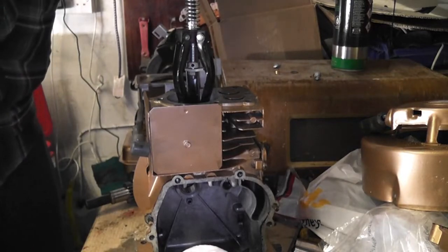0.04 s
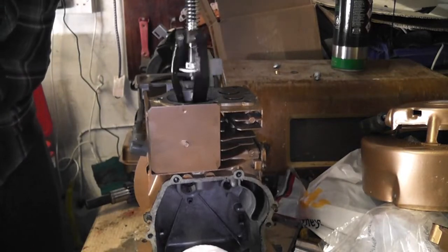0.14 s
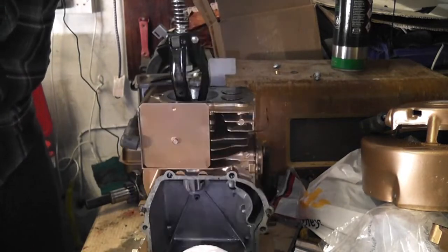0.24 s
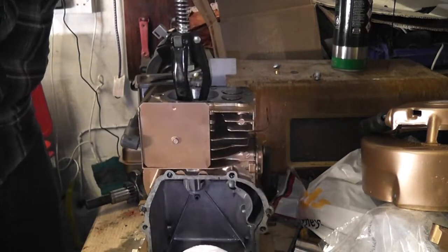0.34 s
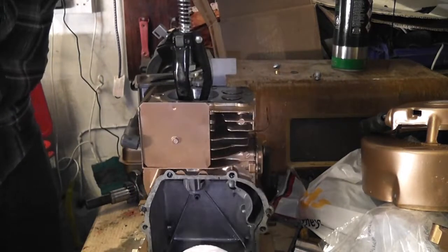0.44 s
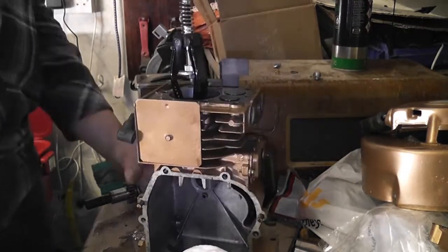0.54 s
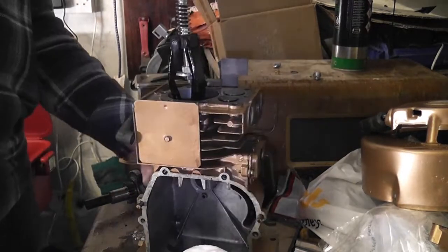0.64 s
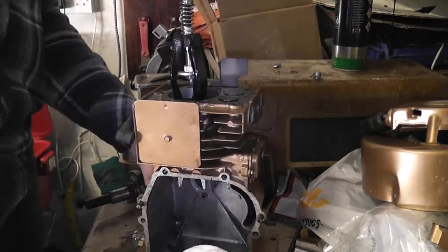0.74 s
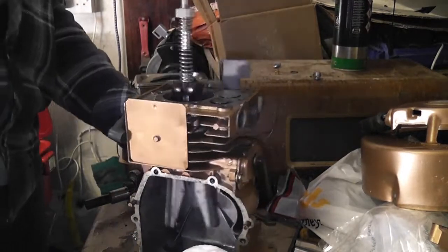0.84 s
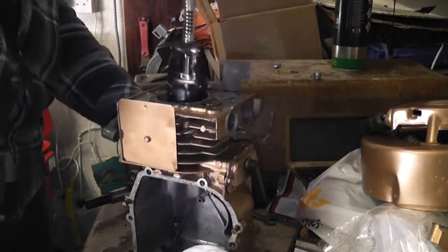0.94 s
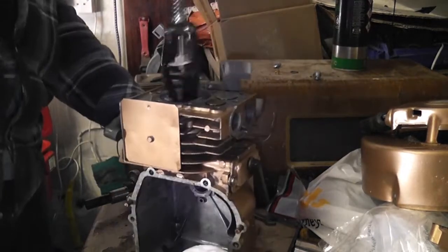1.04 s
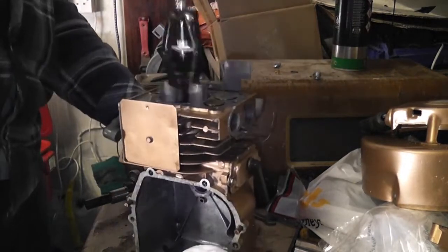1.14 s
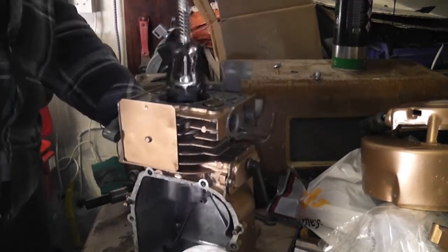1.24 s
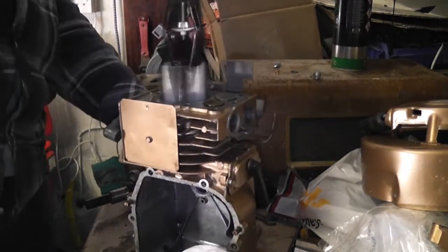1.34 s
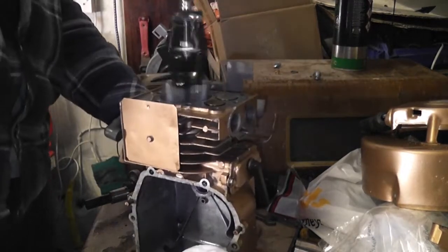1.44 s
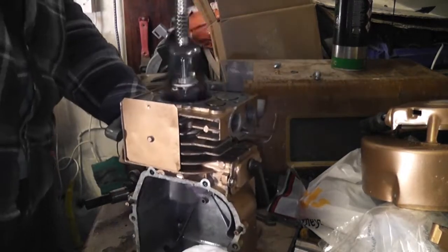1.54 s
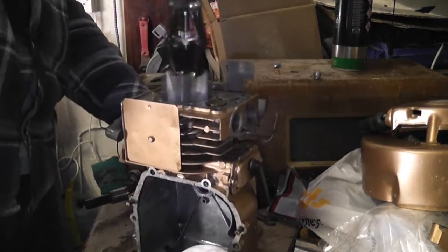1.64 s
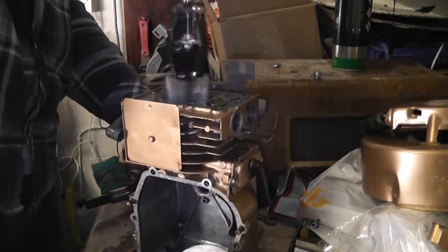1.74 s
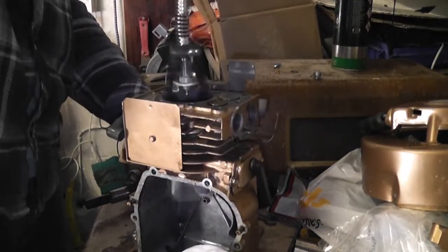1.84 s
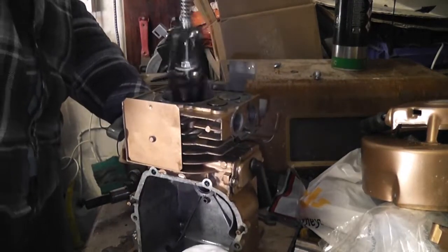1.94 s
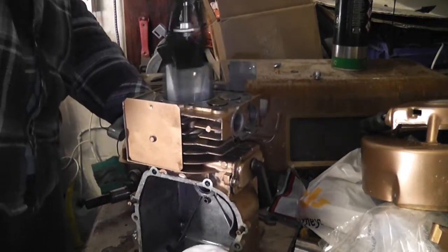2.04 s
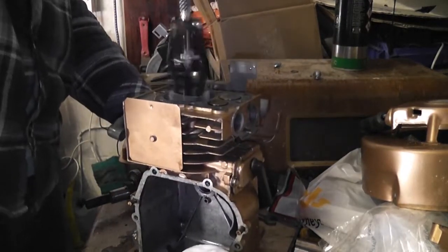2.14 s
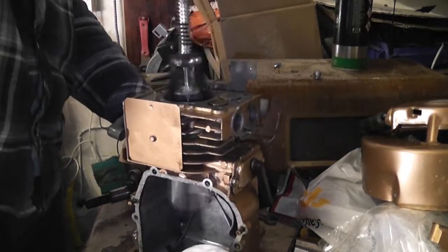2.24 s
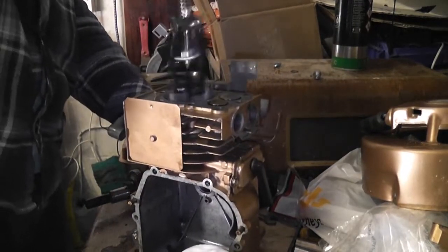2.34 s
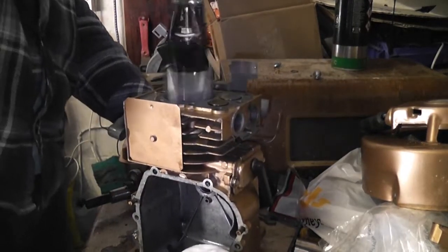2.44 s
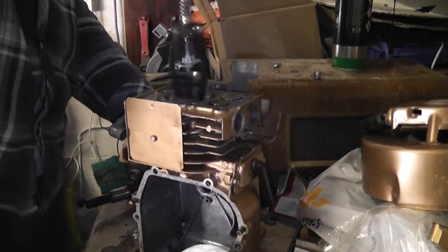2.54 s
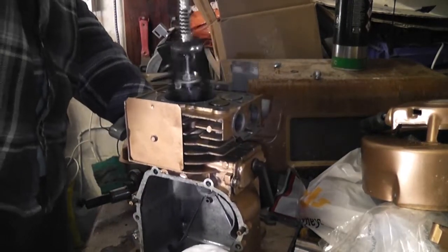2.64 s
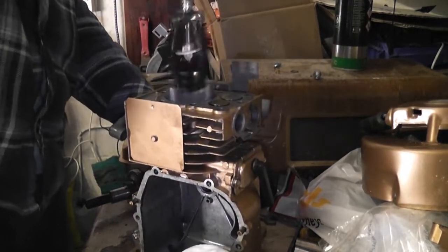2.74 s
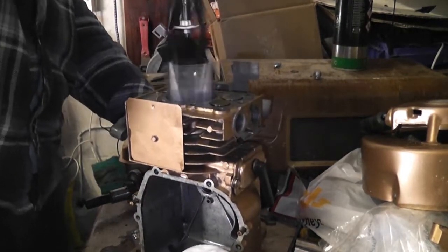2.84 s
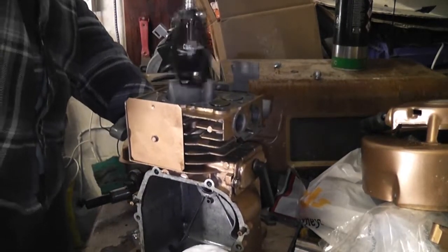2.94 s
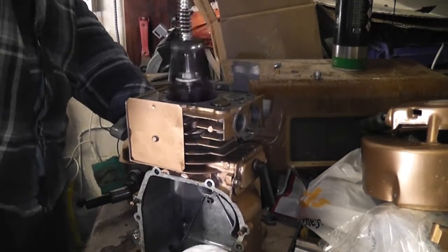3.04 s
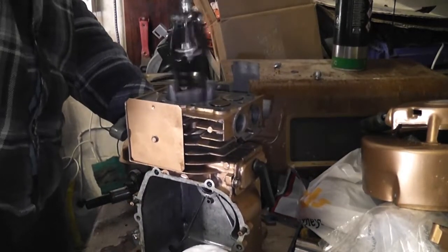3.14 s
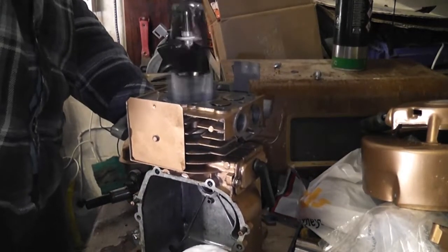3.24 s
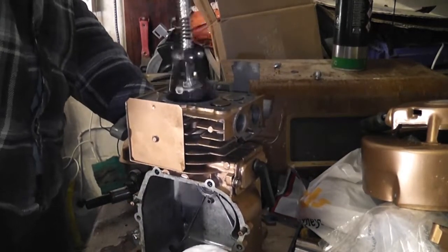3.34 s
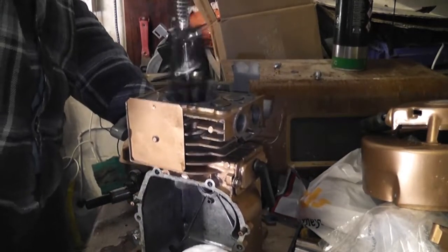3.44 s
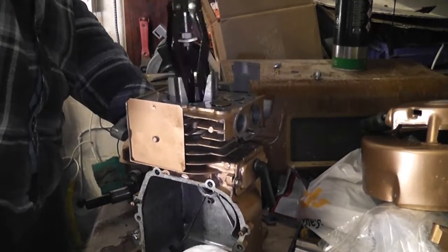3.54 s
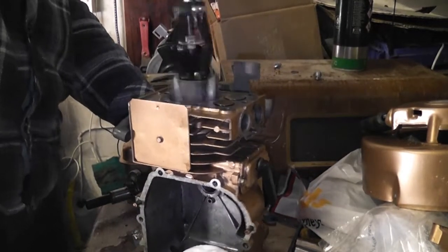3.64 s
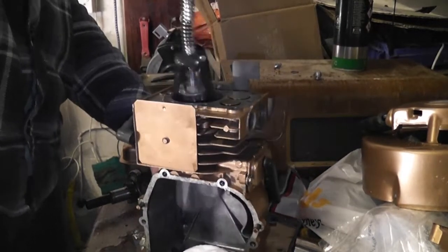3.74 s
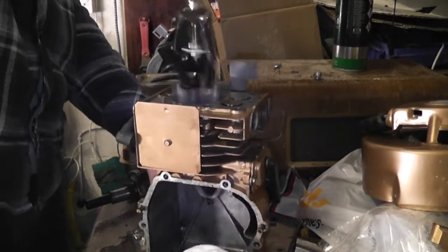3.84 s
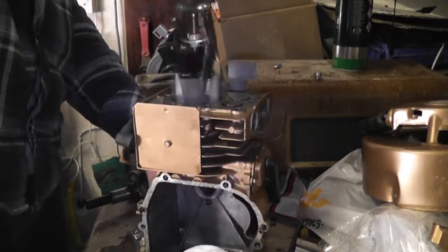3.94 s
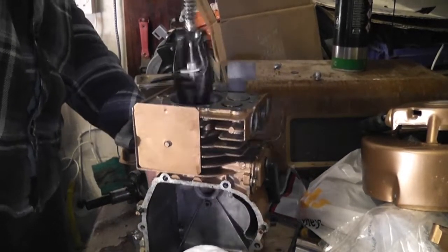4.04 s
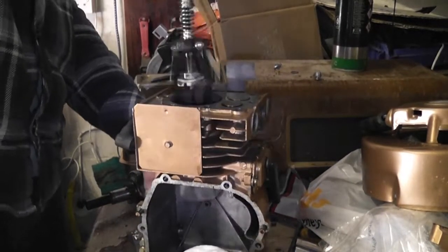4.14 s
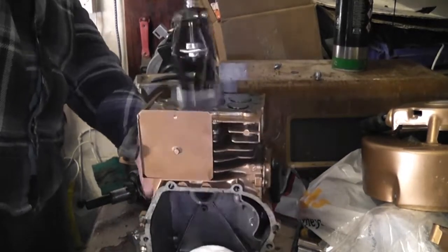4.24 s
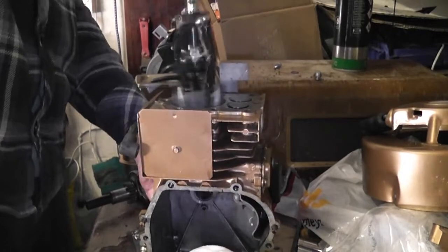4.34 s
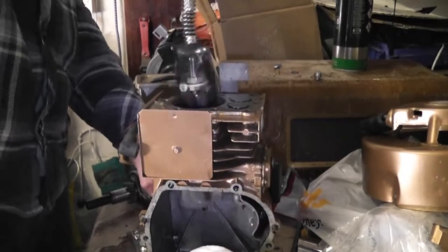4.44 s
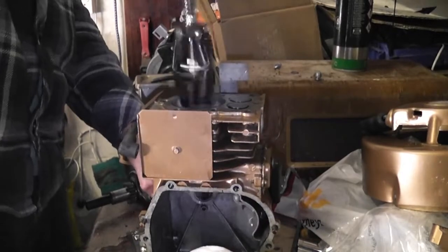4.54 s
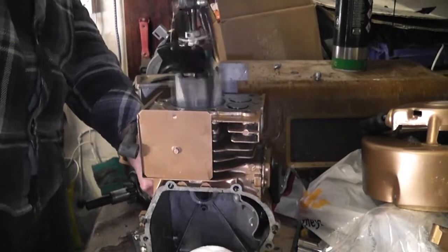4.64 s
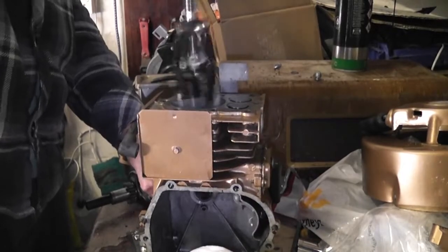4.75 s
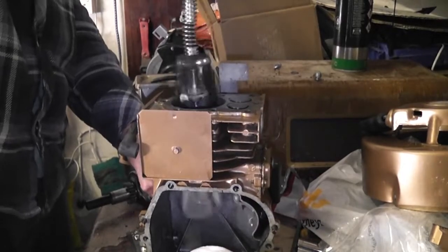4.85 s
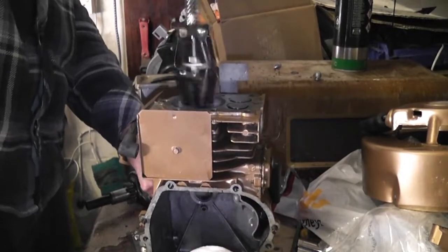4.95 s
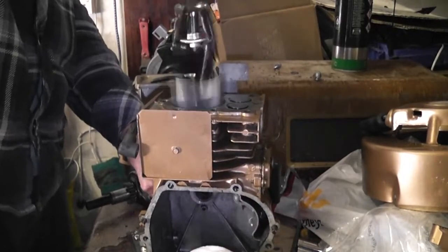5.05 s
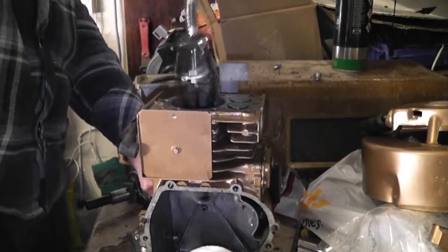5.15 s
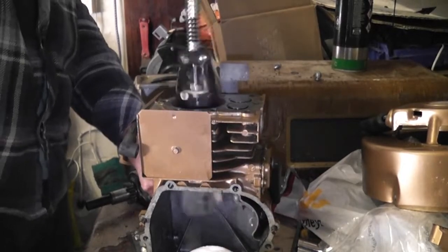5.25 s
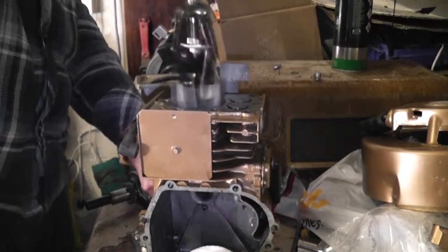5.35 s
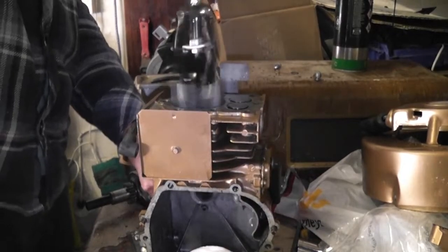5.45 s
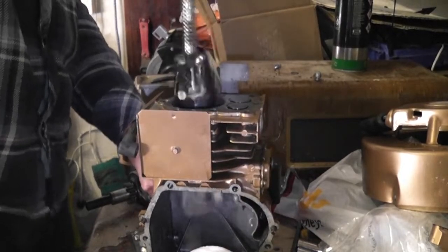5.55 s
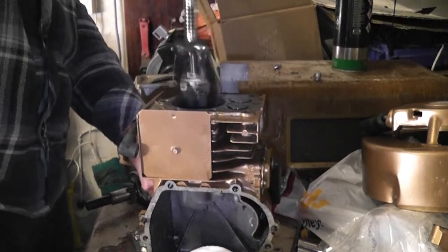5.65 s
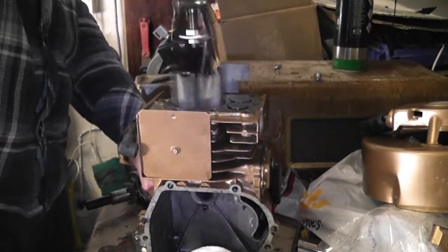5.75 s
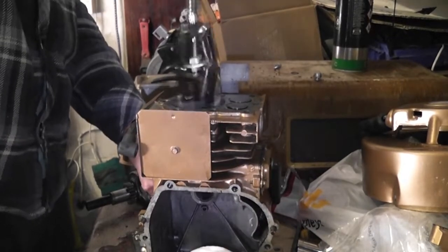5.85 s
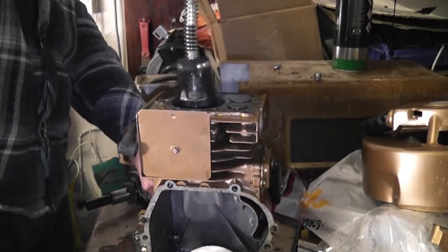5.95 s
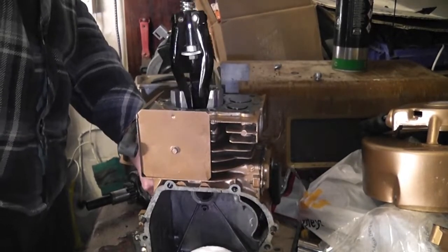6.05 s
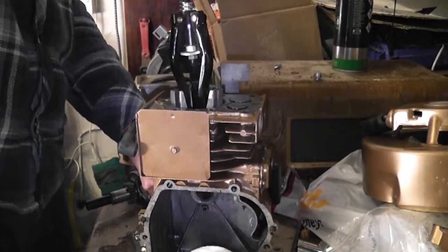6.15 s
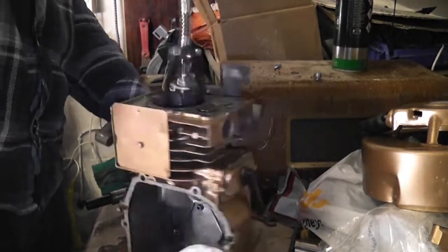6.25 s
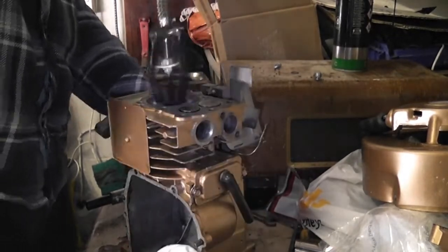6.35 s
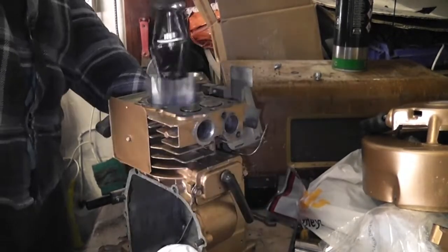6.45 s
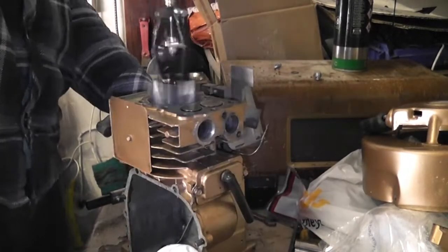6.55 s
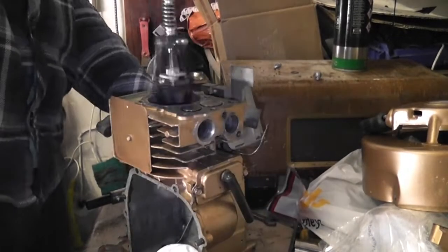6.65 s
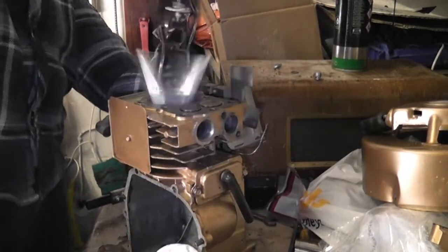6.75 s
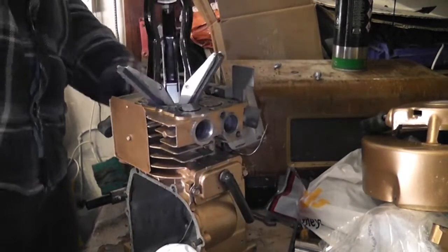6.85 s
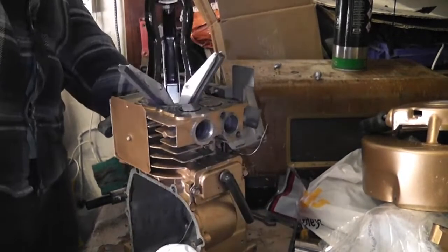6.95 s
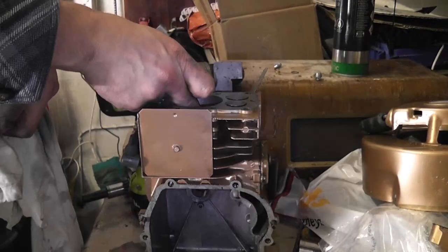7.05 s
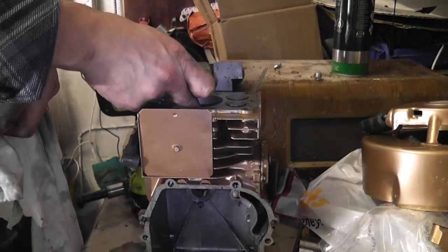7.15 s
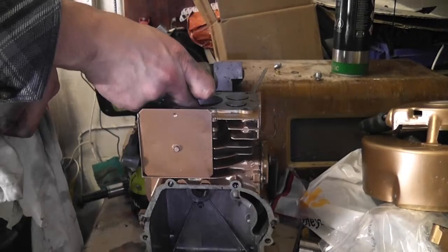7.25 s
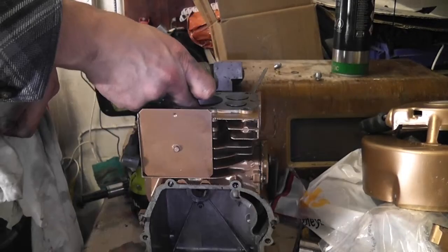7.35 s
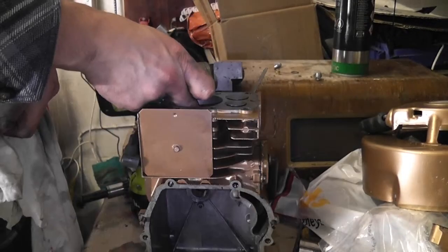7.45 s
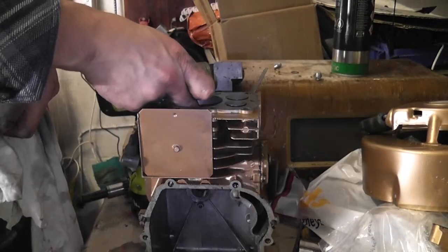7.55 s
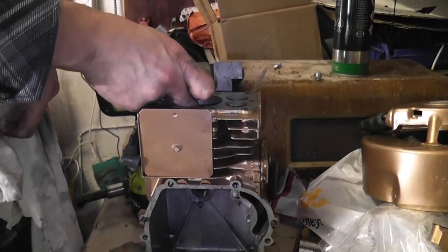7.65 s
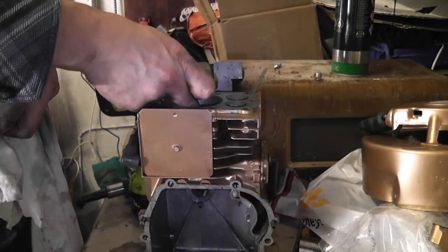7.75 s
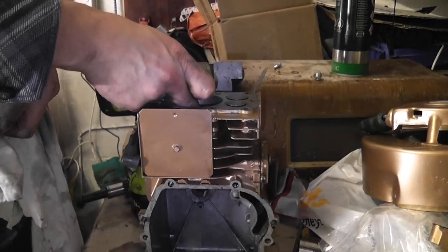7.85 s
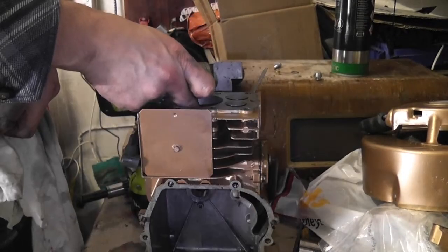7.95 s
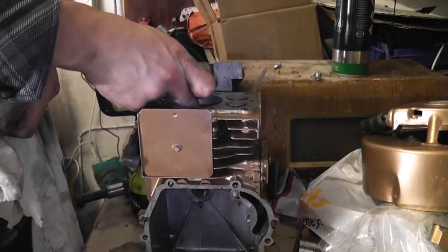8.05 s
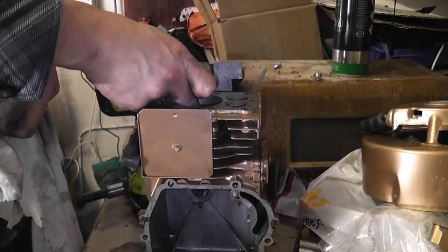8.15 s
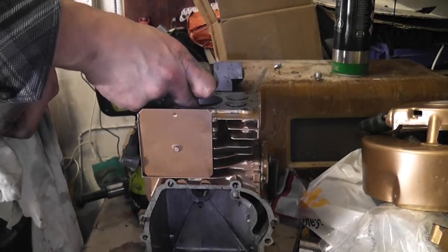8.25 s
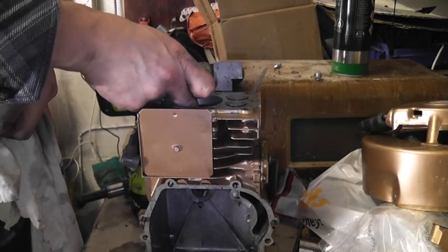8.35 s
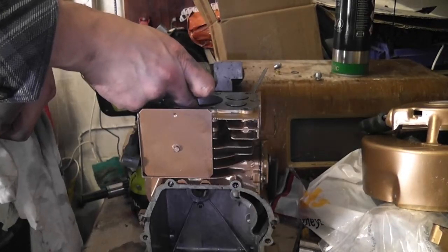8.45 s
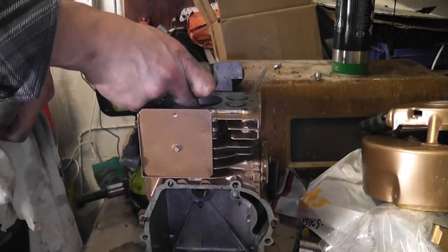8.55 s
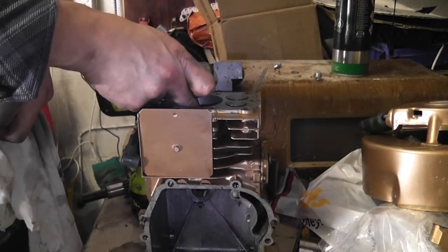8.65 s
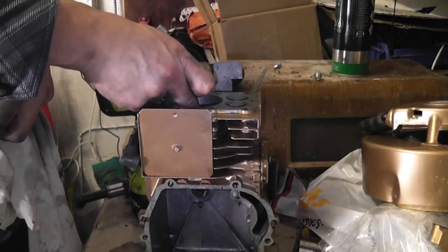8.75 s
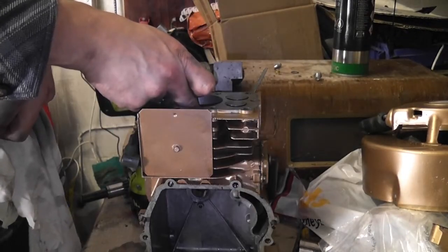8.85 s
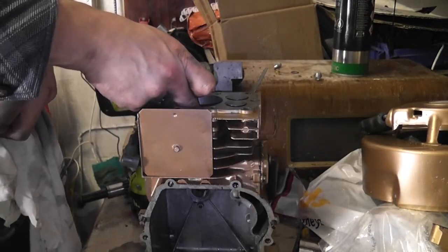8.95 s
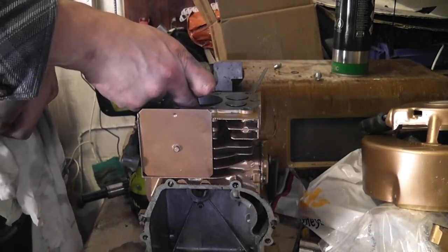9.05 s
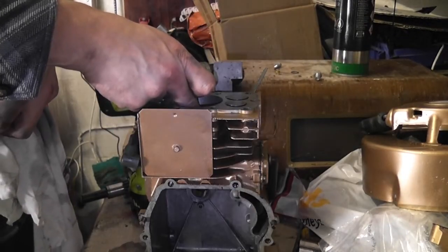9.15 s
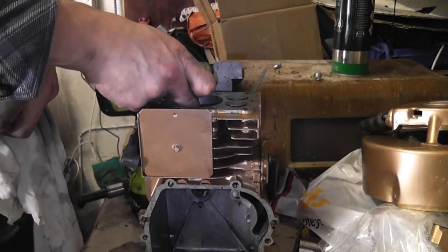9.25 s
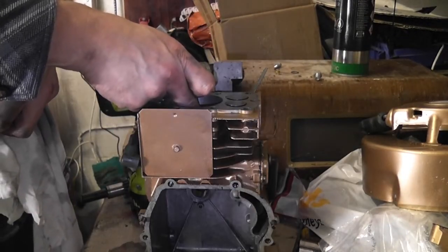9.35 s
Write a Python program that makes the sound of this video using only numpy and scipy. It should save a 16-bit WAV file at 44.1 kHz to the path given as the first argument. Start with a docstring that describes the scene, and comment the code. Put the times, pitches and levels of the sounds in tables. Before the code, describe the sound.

A close stereo microphone in a small, cluttered garage with soft low background noise. From 0 to 0.3 s a small cast engine block clacks sharply and drags across a wooden bench: gritty crunch, high falling screech, judder and low boom, then faint scuffs. At about 0.8 s a drill-driven hone starts abruptly in the bore, a loud, bright, steely hiss fluttering at motor speed, with short gliding squeaks roughly fifteen times a second, thin metallic singing and low bench rumble. It breaks off near 3.55 s with a clack, catches briefly, and resumes at 3.7 s with less steady hiss and more biting, chattering rasps and rough high squeals. It stops at 6.04 s, restarts from 6.2 to 6.77 s, then quits. A firmer thump comes near 7.2 s; until about 9.4 s, sparse, light woody-metal knocks and faint finger rubbing sit over the returning low room noise.

```python
"""A small engine block knocks and is dragged across a wooden bench with a screech, a judder and a boom.
A cordless drill then spins a three-stone hone in its bore: friction noise makes a bright hiss that flutters
at motor speed, gliding partials squeak as stones pass, and the metal sings; later the stones bite and chatter.
When the drill has stopped, a hand in the bore rocks the block, and decaying modes knock lightly on the bench."""
import sys
import numpy as np
from scipy import signal
from scipy.fft import rfft, irfft
from scipy.io import wavfile

SR = 44100
rng = np.random.default_rng(int(sys.argv[2]) if len(sys.argv) > 2 else 0)


def bounce(signal):
    """Save signal as a 16-bit WAV file at the path given by the first command-line argument."""
    frames = np.transpose(np.atleast_2d(signal))
    limited = np.clip(frames, -1, 1)
    pcm = np.round(limited * 32767).astype(np.int16)
    wavfile.write(sys.argv[1], SR, pcm)


N = 414788
T = np.arange(N) / SR

# Levels in the tables are relative: the functions trim their layers. Of a spectrum only the shape counts.


def amp(db):
    """Decibels to gain."""
    return np.exp(np.asarray(db) * (np.log(10) / 20))


def rms_one(x):
    """Scale to unit power."""
    return x / np.sqrt(np.mean(x ** 2) + 1e-20)


def level(rows, column=1):
    """A dB column as a gain over time, down at -120 dB outside its span."""
    rows = np.array(rows)
    return amp(np.interp(T, rows[:, 0], rows[:, column], left=-120, right=-120))


def along(rows, s):
    """The columns of a curve at the given moments, or other first-column values."""
    times, *columns = np.transpose(rows)
    return [np.interp(s, times, column) for column in columns]


def colour(x, spectrum, size=16384):
    """Causal (minimum-phase) filter with the given spectrum; unit power."""
    hz, db = np.transpose(spectrum)
    bins_hz = np.arange(size // 2 + 1) * SR / size
    gain = amp(np.interp(np.log(bins_hz + 1), np.log(hz), db))
    # folding the cepstrum onto positive time gives minimum phase
    cepstrum = irfft(np.log(gain))
    cepstrum[1:size // 2] *= 2
    cepstrum[size // 2 + 1:] = 0
    impulse = irfft(np.exp(rfft(cepstrum)))
    return rms_one(signal.oaconvolve(x, impulse[None], axes=1)[:, :N])


def drift(rate):
    """Smooth chance with so many random points a second; unit power."""
    points = rng.standard_normal(int(N / SR * rate) + 2)
    return rms_one(np.interp(T * rate, np.arange(len(points)), points))


def stereo_noise(alike):
    """White noise, partly shared by both ears."""
    alike = np.clip(alike, 0, 1)
    shared = rng.standard_normal(N)
    return np.sqrt(alike) * shared + np.sqrt(1 - alike) * rng.standard_normal((2, N))


def grains(alike, rough_db, rate):
    """Friction noise: grit breaks away in tiny bursts of uneven strength."""
    return stereo_noise(alike) * amp(rough_db * drift(rate))


def poles(hz, width):
    """Second-order polynomial of a resonance; its width in Hz sets the damping."""
    r = np.exp(-np.pi * width / SR)
    return np.array([1, -2 * r * np.cos(2 * np.pi * hz / SR), r * r])


def ring(x, hz, t60):
    """A unit click sets a decaying sine of starting height 1 ringing."""
    width = np.log(1000) / np.pi / t60
    return signal.lfilter([0, np.sin(2 * np.pi * hz / SR)], poles(hz, width), x + 1e-18)


def swell(s, length):
    """The samples around a moment, and a flat-topped swell over them."""
    near = slice(max(int((s - length) * SR), 0), int((s + length) * SR))
    return near, np.exp(-(2 * (T[near] - s) / length) ** 4)


def swells(rows):
    """Gain over time of (t/s, length/s, level/dB) swells."""
    gain = np.zeros(N)
    for s, length, db in rows:
        near, shape = swell(s, length)
        gain[near] += amp(db) * shape
    return gain


def tones(rows, wander, waver_hz, flicker_db):
    """Wavering sines on (t/s, length/s, f/Hz, level/dB) swells, out of step between the ears."""
    out, slow, fast = np.zeros((2, N)), drift(9), drift(110)
    flicker = amp(flicker_db * drift(24))
    ears = np.array([0.33 * drift(12.0), 1.4 + 0.19 * drift(6.45)])  # phase in radians
    for s, length, hz, db in rows:
        near, shape = swell(s, length)
        pitch = hz * (1 + wander * slow[near]) + waver_hz * fast[near]
        phase = 2 * np.pi * np.cumsum(pitch) / SR
        out[:, near] += amp(db) * shape * flicker[near] * np.sqrt(2) * np.sin(phase + ears[:, near])
    return out


def room(x, t60):
    """Diffuse reflections off the cluttered walls, different at each ear."""
    t = T[:SR // 2]
    tail = rng.standard_normal((2, len(t))) * amp(-60 * t / t60) * (t > .003)
    tail = tail / np.sqrt((tail ** 2).sum(1, keepdims=True))
    return signal.fftconvolve(np.atleast_2d(x), tail, axes=1)[:, :N]


# background of the garage: (t/s, level/dB)
GARAGE_LEVEL = [(0, -44.5), (.72, -48), (.76, -49.5), (6.85, -65.5), (6.95, -57), (7.01, -47.5),
                (9.41, -47)]
# spectrum of that background: (f/Hz, level/dB per Hz)
AIR_SPECTRUM = [(25, -35.5), (70, -6.5), (120, -1.5), (155, 2.5), (205, -9.5), (330, -10), (450, -8.5),
                (740, -12.5), (930, -10.5), (1450, -21), (2500, -26.5), (6000, -35.5), (9000, -40.5),
                (16000, -51.5)]


def garage_air():
    """Soft noise, strongest in the lows; it sinks gradually until almost 7 s, then returns quickly."""
    return level(GARAGE_LEVEL) * colour(grains(0.7, rough_db=0.26, rate=38), AIR_SPECTRUM)


# ringing modes of the cast block: (f/Hz, level/dB, t60/s)
CASTING_MODES = [(1230, -23, .03), (1560, 2.5, .008), (2364, -5.5, .035), (2850, -16, .022),
                 (3233, -5.5, 0.057), (3430, -3, 0.025), (4260, -6, 0.012), (5500, -9.5, 0.029),
                 (6200, -2, 0.027), (6900, -9.5, .035), (7500, -4, .018)]


def casting(x, vary_db):
    """The block's modes ring, each more or less strongly as the point of contact moves."""
    out = 0
    for hz, db, t60 in CASTING_MODES:
        even_power = np.sqrt(4 * np.log(1000) / (t60 * SR))  # white noise excites long and short modes alike
        out = out + amp(db + vary_db * drift(12)) * even_power * ring(x, hz, t60)
    return out


# the block knocks on the bench: (t/s, click level/dB, thump level/dB, scuff length/s)
BENCH_KNOCKS = [(0.031, -43.5, -62, 0.0084), (0.066, -29.5, -61, 0.002), (0.097, -30.5, -58, 0.018),
                (0.1439, -4.5, -37, 0.0019), (.153, -17, -29, .003), (.173, -10.5, -32, .005),
                (.267, -28, -21, .002), (.276, -22, -25, .002), (0.408, -24.5, -39, 0.015),
                (0.429, -30, -35.5, 0.015), (0.515, -37, -46, 0.012), (0.538, -41, -55, 0.0045),
                (.565, -42, -60, .005), (0.589, -32.5, -59, 0.023), (0.641, -32, -33.5, 0.029),
                (0.703, -27, -44, 0.005), (0.748, -36, -52, 0.0033), (6.811, -36.5, -46, 0.0095),
                (6.877, -47, -49, 0.0059), (7.124, -34.5, -32.5, 0.0044), (7.1753, -26, -22, 0.0063),
                (7.583, -34, -32.5, 0.004), (7.608, -46, -35, .012), (7.636, -50, -34, 0.016),
                (7.662, -45, -44, .005), (7.938, -35, -29, 0.012), (7.972, -35, -30.5, 0.0049),
                (7.989, -37, -35, 0.006), (8.049, -40, -34, 0.012), (8.218, -46, -36.5, 0.018),
                (8.398, -34.5, -26, 0.0072), (8.444, -33, -37, 0.0065), (8.517, -43, -41, 0.0089),
                (8.581, -38.5, -31.5, 0.0078), (8.739, -41, -29.5, 0.007), (8.783, -34.5, -28, 0.0074),
                (8.952, -39, -39.5, 0.0066), (9.131, -43, -31.5, 0.0066), (9.142, -32.5, -28.5, 0.0071),
                (9.287, -31.5, -32.5, 0.0051)]
# modes of the block on its bench: (f/Hz, level/dB, t60/s)
BENCH_MODES = [(132.5, -4, 0.14), (164.3, -1, 0.17), (228, -5, 0.082), (431, -5.5, 0.098),
               (465, -0.5, 0.027), (578, 5, 0.038), (642, -1, 0.02), (910, -23, 0.05), (1260, -35, .03)]
# spectrum of the scuffing grit: (f/Hz, level/dB per Hz)
GRIT_SPECTRUM = [(600, -31.5), (1500, 10.5), (2300, 0), (3350, 6), (4800, 0), (6200, 2.5), (7400, 4),
                 (8600, -1), (12000, -10.5), (16000, -16)]
SCUFF_RISE, THUMP_LAG_S = 0.23, .002   # share of the scuff's length; the bench answers a little later
# after each knock the block settles with a softer one: typical delay, levels relative to the knock
SETTLE_S, SETTLE_CLICK_DB, SETTLE_THUMP_DB = .032, -15, -10


def knocks():
    """Each knock is a gritty scuff ringing in the casting, and a thump with a small rebound in the bench."""
    scuff, thump = np.zeros(N), np.zeros(N)
    settling = [(s + SETTLE_S * rng.uniform(.7, 1.3), click_db + SETTLE_CLICK_DB,
                 thump_db + SETTLE_THUMP_DB, length) for s, click_db, thump_db, length in BENCH_KNOCKS]
    rows = np.vstack([BENCH_KNOCKS, settling])
    for s, click_db, thump_db, length in rows:
        start = int(s * SR)
        age = T[:min(SR // 4, N - start)]
        rise = 1 - np.exp(-age / (SCUFF_RISE * length))
        scuff[start:start + len(age)] += amp(click_db) * np.exp(-age / length) * rise
    s, _, thump_db, _ = np.transpose(rows)
    s = s + THUMP_LAG_S
    rebound = s + rng.uniform(0.00367, 0.0167, len(s))
    for k, (hz, db, t60) in enumerate(BENCH_MODES):
        blows = np.zeros(N)
        blows[(s * SR).astype(int)] = amp(thump_db + db + rng.normal(0, 0.7, len(s)))
        blows[(rebound * SR).astype(int)] = amp(thump_db + db - 2.5 + rng.normal(0, 1.6, len(s)))
        thump += (-1) ** k * ring(blows, hz, t60)  # neighbouring modes start in opposite directions
    grit = grains(0.89, rough_db=0.5, rate=1600)
    ringing = casting(scuff * grit, vary_db=3.0)
    return amp(-2.54) * scuff * colour(grit, GRIT_SPECTRUM) + amp(-11.5) * ringing + amp(-4.0) * thump


# the screech of the dragged block: (t/s, f/Hz, level/dB)
SCREECH_GLIDES = [(.075, 7220, -54), (.11, 6600, -47.5), (.128, 4200, -37), (.14, 3160, -32.5),
                  (.155, 3000, -70), (.178, 7500, -22), (.205, 7200, -23), (.217, 6650, -20),
                  (.235, 6500, -33.5)]


def screeching(waver=.035):
    """An edge of the sliding block screeches in falling glides: a sine with a rough pitch and level."""
    hz, _ = along(SCREECH_GLIDES, T)
    phase = 2 * np.pi * np.cumsum(hz * (1 + waver * drift(900))) / SR
    return level(SCREECH_GLIDES, column=2) * amp(2.5 * drift(370)) * np.sin(phase)


# the block is dragged: (t/s, grit level/dB, judder level/dB, bench boom level/dB)
DRAG_LEVELS = [(.115, -42, -44, -61), (.155, -22, -38, -34), (.18, -16, -38, -18.5), (.22, -22.5, -30, -20),
               (.25, -20, -23.5, -19.5), (.275, -32.5, -19.5, -18), (.297, -34, -26, -26),
               (.35, -53, -43.5, -33), (.42, -59, -56, -59)]
# spectrum of grit crushed under the block: (f/Hz, level/dB per Hz)
CRUNCH_SPECTRUM = [(600, -21.5), (1500, -8), (2300, -0.5), (3000, -3), (4800, 0), (5700, 0.5), (6800, -1.5),
                   (7700, -2), (8700, -12), (12000, -14.5), (16000, -39)]
# spectrum of the juddering block: (f/Hz, level/dB per Hz)
JUDDER_SPECTRUM = [(200, -19), (380, -2), (500, 1), (575, 4.5), (700, -0.5), (830, -11), (950, -5),
                   (1080, -16.5), (1230, -3), (1450, -10.5), (1740, -8), (2100, -15.5), (2500, -20.5),
                   (2690, -11), (2900, -19), (4100, -25.5), (6000, -44)]
# spectrum of the booming bench: (f/Hz, level/dB per Hz)
BOOM_SPECTRUM = [(25, -29), (90, -48), (128, 1.5), (160, 4), (225, -1.5), (320, -11), (600, -53)]


def dragging():
    """Grit crackles under the block; as it slows it judders and the bench booms."""
    grit = level(DRAG_LEVELS) * colour(grains(1.0, rough_db=2.5, rate=900), CRUNCH_SPECTRUM)
    judder = level(DRAG_LEVELS, column=2) * colour(grains(0.88, rough_db=1.5, rate=270), JUDDER_SPECTRUM)
    boom = level(DRAG_LEVELS, column=3) * colour(grains(0.93, rough_db=2.5, rate=100), BOOM_SPECTRUM)
    return amp(-1.2) * grit + screeching() + amp(0.5) * judder + amp(-5.5) * boom


# fingers rub the metal: (t/s at the middle, length/s, level/dB)
FINGER_RUBS = [(.33, 0.32, -52), (3.6, 0.14, -54), (6.163, 0.04, -63), (7.06, 0.29, -60),
               (7.36, 0.091, -63), (7.727, 0.031, -62), (7.81, 0.087, -59), (8.26, 0.18, -64),
               (8.53, 0.23, -69), (9.32, 0.2, -55.5)]
# spectrum of skin and sleeve on metal: (f/Hz, level/dB per Hz)
RUB_SPECTRUM = [(600, -25.5), (1500, 7.5), (2300, -1), (3350, 3), (4800, 0.5), (5900, 5), (7400, 0.5),
                (8600, -6), (12000, -17), (16000, -24)]
RESTING_HAND_DB = -72.5


def rubbing():
    """Fingers slide over the casting; once the drill has stopped the hand rests in the bore."""
    touch = swells(FINGER_RUBS) + amp(RESTING_HAND_DB) * (T > DRILL_RUNS[-1][1])
    return touch * colour(grains(1.0, rough_db=1.5, rate=33), RUB_SPECTRUM)


# while the drill rests the stones tick against the bore: (t/s, tick level/dB, clack f/Hz, clack level/dB)
STONE_TICKS = [(0.325, -42, 1740, -27), (3.582, -24, 1120, -25), (3.6, -32, 620, -32),
               (6.089, -38, 1050, -41), (6.921, -45, 1600, -43), (6.969, -45, 1500, -52)]
# modes of a stone on its arm: (f/Hz, level/dB, t60/s)
STONE_MODES = [(1560, -10, 0.0084), (1890, -13, .011), (2780, 2, .015), (3470, 2, .016), (5400, -5, .013),
               (7000, -9, .01), (8000, -13, .012)]


def ticks(count=2, spread=0.0024, crack_db=-6, crack_s=0.0083, body_t60=0.033):
    """A stone taps the wall with a gritty crack and short chatter; the bore clacks at a pitch set by the spot."""
    s, db, body_hz, body_db = np.transpose(STONE_TICKS)
    delays = spread * rng.random((len(s), count)) * (np.arange(count) > 0)
    clicks = np.zeros(N)
    clicks[((s[:, None] + delays) * SR).astype(int)] = amp(db[:, None] - 3.0)
    cracks = [(at + crack_s / 2, crack_s, peak + crack_db) for at, peak in zip(s, db)]
    out = swells(cracks) * colour(stereo_noise(0.39), GRIND_SPECTRUM)
    for at, hz, peak in zip(s, body_hz, body_db):
        out = out + amp(peak + 1.0) * ring(np.arange(N) == int(at * SR), hz, body_t60)
    for hz, mode_db, t60 in STONE_MODES:
        ear_signs = rng.choice([-1, 1], (2, 1))
        out = out + amp(mode_db) * ring(clicks, hz, t60) * ear_signs
    return out


# the stones grind while the trigger is held: (start t/s, stop t/s)
DRILL_RUNS = [(0.773, 3.547), (3.644, 3.692), (3.718, 6.036), (6.183, 6.766)]
ATTACK_S, RELEASE_DB_PER_S = 0.0053, 950


def running():
    """Gain of the drill's runs: a quick start and a short run-down."""
    gain = np.zeros(N)
    for start, stop in DRILL_RUNS:
        attack = np.clip((T - start) / ATTACK_S, 0, 1)
        gain += attack * amp(-RELEASE_DB_PER_S * np.maximum(T - stop, 0))
    return gain


# pressure on the hone: (t/s, grinding hiss level/dB, rumble of block and bench level/dB)
HONE_PRESSURE = [(0.78, -16, -34), (0.88, -18.5, -25.5), (1.0, -17, -34.5), (1.5, -17.5, -34),
                 (2.85, -18.5, -34.5), (3.54, -20, -34), (3.72, -18, -32.5), (3.85, -22.5, -36.5),
                 (4.1, -25, -35.5), (4.28, -20.5, -35.5), (4.5, -29, -41), (4.9, -27, -41),
                 (5.5, -29, -41.5), (6.03, -29, -45.5), (6.2, -20, -25.5), (6.38, -21, -40.5),
                 (6.56, -21.5, -36), (6.76, -23, -33)]
# the stones lose their grip for a moment: (t/s at the middle, length/s, dip level/dB)
GRIP_SKIPS = [(0.832, 0.047, -5.5), (1.12, 0.043, -5.5), (1.519, 0.011, -3.5), (3.178, 0.046, -3.5),
              (3.947, 0.015, -3), (4.08, 0.018, -5.5), (4.497, .022, -3), (4.775, 0.031, -2.5),
              (6.355, 0.054, -6.5), (6.474, 0.059, -5.5)]


def pressure():
    """Gains of the grinding hiss and of the rumble, both dipping where the stones lose grip."""
    hiss_db, rumble_db = along(HONE_PRESSURE, T)
    dip_db = np.zeros(N)
    for s, length, db in GRIP_SKIPS:
        near, shape = swell(s, length)
        dip_db[near] += db * shape
    return amp(np.array([hiss_db, rumble_db]) + dip_db)


# a reflection off the far wall, shifting as the hone moves in the bore
WALL_ECHO_S, WALL_SHIFT_S, WALL_ECHO_DB = .0014, .00013, -6


def wall_echo(x):
    """Add a close reflection whose path slowly changes, differently for each ear."""
    lags = [WALL_ECHO_S + WALL_SHIFT_S * drift(7) for ear in x]
    echo = np.array([np.interp(T - lag, T, ear) for lag, ear in zip(lags, x)])
    return x + amp(WALL_ECHO_DB) * echo


HOOT_FADE_DB_PER_S = 1.37


def bore_hoot(hiss):
    """The air in the bore hoots along with the hiss: noise through one resonance, slowly fading."""
    hoot = rms_one(ring(stereo_noise(0.072), hz=1216.0, t60=0.041))
    return amp(-17 - HOOT_FADE_DB_PER_S * T + 3.3 * drift(22)) * hiss * hoot


# spectrum of the grinding stones: (f/Hz, level/dB per Hz)
GRIND_SPECTRUM = [(600, -23), (1000, -46), (1400, -13.5), (2200, -5.5), (2700, -6.5), (3300, -3.5),
                  (4600, -4), (5600, 0), (6600, 2.5), (7700, -0.5), (9000, -8), (11900, -11.5),
                  (13000, -15.5), (16000, -26.5)]
MOTOR_HZ = 187.4   # mean turns per second


def grinding(hiss, bites):
    """Stones on the cylinder wall: a rasp that follows the pressure, plus bites, fluttering with the motor."""
    turn = 2 * np.pi * np.cumsum(MOTOR_HZ * (1 + 0.00062 * drift(3.01))) / SR
    flutter = 1 + 0.077 * np.cos(turn) + 0.033 * np.cos(2 * turn)
    friction = wall_echo(grains(0.032, rough_db=1.5, rate=800))
    steady = amp(-1.27 + 0.96 * drift(70)) * hiss * colour(friction, GRIND_SPECTRUM)
    scrape = (steady + bites) * flutter
    # a wall mode with a dead spot just below it
    scrape = signal.lfilter(poles(2480, 68), poles(2519, 110), scrape)
    return scrape + bore_hoot(hiss)


# the hone jolts the block: (t/s at the middle, length/s, level/dB)
BLOCK_JOLTS = [(0.78, 0.0078, -25), (0.885, 0.082, -30), (1.03, 0.074, -35), (1.082, 0.021, -25.5),
               (1.28, 0.028, -31.5), (1.547, 0.037, -35.5), (1.81, 0.031, -40), (2.17, .05, -38.5),
               (2.834, 0.053, -35.5), (3.132, 0.023, -40), (3.675, 0.025, -31), (3.735, 0.023, -37),
               (4.034, 0.019, -34), (4.113, 0.0055, -25.5), (4.197, 0.02, -34), (4.295, 0.025, -35.5),
               (4.724, 0.034, -34.5), (6.237, 0.011, -25), (6.705, 0.011, -25)]
# the turning hone makes block and bench drone in surges: (t/s at the middle, length/s, f/Hz, level/dB)
BLOCK_DRONES = [(.87, 0.095, 137.3, -31), (1.02, .09, 136, -33.5), (1.39, 0.12, 105, -43.5),
                (1.8, 0.059, 126, -37), (1.93, 0.093, 112, -40), (2.06, 0.069, 126, -39),
                (2.17, .1, 115, -35), (2.46, .07, 114.6, -38), (2.62, 0.12, 112, -39),
                (2.72, 0.061, 124, -38.5), (2.97, 0.088, 115, -37), (3.13, 0.16, 121, -38),
                (3.3, 0.11, 111, -41), (3.48, 0.19, 113, -38), (1.24, 0.097, 223, -35.5),
                (1.45, 0.22, 225, -40), (1.8, .13, 228, -39), (2.0, 0.098, 218.3, -38.5),
                (2.18, 0.13, 211.7, -35), (2.29, .09, 230.5, -35), (2.42, 0.078, 220.4, -34.5),
                (2.55, .15, 230.4, -32.5), (2.9, .13, 221.5, -35.5), (3.3, .07, 228, -45),
                (3.72, 0.13, 231, -35), (4.15, 0.37, 226, -52)]
# spectrum of the shaking block: (f/Hz, level/dB per Hz)
RUMBLE_SPECTRUM = [(25, -10.5), (60, -9.5), (110, -2), (140, 0), (175, -4.5), (222, 3.5), (290, -7.5),
                   (420, -9.5), (600, -11), (800, -14.5), (1100, -12), (1600, -38.5)]
# spectrum of a jolt: (f/Hz, level/dB per Hz)
JOLT_SPECTRUM = [(25, -3), (55, -3), (100, -6), (150, 8), (230, 0.5), (320, -0.5), (600, -6.5),
                 (900, -13.5), (1500, -35)]
DRONE_WANDER = 0.021   # share of the pitch


def rumbling(shake):
    """The block shakes on the bench: a rumble with jolts and wandering drones."""
    rumble = shake * colour(grains(0.034, rough_db=3.0, rate=130), RUMBLE_SPECTRUM)
    drones = tones(BLOCK_DRONES, DRONE_WANDER, waver_hz=6.8, flicker_db=3.5)
    jolts = swells(BLOCK_JOLTS) * colour(stereo_noise(0.11), JOLT_SPECTRUM)
    return amp(-2.5) * rumble + amp(3.0) * jolts + amp(-1.5) * drones


# a stone squeaks as it passes the tight side of the bore:
# (t/s, half length/s, f/Hz, glide as share of the pitch per s, fundamental level/dB, octave level/dB)
STONE_SQUEAKS = [(0.804, 0.02, 1820.0, 0.5, -36.0, -30.5), (0.882, 0.009, 1890, -1, -38, -40),
                 (0.929, 0.022, 1740.0, 4.0, -33.5, -32), (1.046, 0.006, 1400.0, -2.5, -43, -30.0),
                 (1.111, 0.018, 1800, 1.5, -33.5, -32.5), (1.22, 0.019, 1510.0, -6.0, -33.5, -38),
                 (1.273, 0.0077, 2070, 2.0, -38, -32), (1.343, 0.019, 1855, 0.0, -33.5, -37.5),
                 (1.418, 0.0079, 2000.0, -1.5, -41, -39), (1.497, 0.019, 1740.0, -1.5, -38.5, -34.5),
                 (1.572, 0.012, 1875, 0.5, -36.5, -34), (1.65, 0.009, 1960.0, -5.5, -37, -41),
                 (1.71, 0.0069, 1836, 1, -36, -26.5), (1.8, 0.0067, 1840.0, 0.5, -33, -37),
                 (1.85, 0.017, 2100.0, 2.0, -40.0, -40.0), (1.932, 0.009, 1750, -1, -39.5, -44),
                 (1.997, 0.018, 1380, 3.5, -46, -41.0), (2.069, 0.017, 1440.0, -2.0, -38, -50),
                 (2.123, 0.0084, 1890, 1, -38, -28.0), (2.195, 0.011, 1830, -1, -33.5, -33),
                 (2.259, 0.014, 1790, 0.5, -33.5, -36), (2.337, 0.017, 1893, -2.0, -41, -34),
                 (2.402, 0.0053, 1840.0, 0.0, -32, -28), (2.468, 0.011, 1990, 0.5, -36, -34.0),
                 (2.53, 0.009, 1930, -0.5, -45.0, -37.5), (2.602, 0.009, 1870, 3, -36.0, -51),
                 (2.666, 0.021, 2100.0, 7.5, -47, -42.0), (2.733, 0.016, 1800.0, 1, -37.0, -34),
                 (2.861, 0.018, 1830, 0.0, -36, -31.5), (2.933, 0.013, 1470.0, -4.5, -43, -45),
                 (2.996, 0.014, 1560.0, 3.5, -38, -31.5), (3.066, 0.022, 2090, 4.0, -52, -39.5),
                 (3.124, 0.016, 1830, -2.5, -38, -31), (3.179, 0.009, 1490.0, -3.5, -57, -40.0),
                 (3.221, 0.009, 2116, 0.0, -33, -42), (3.291, 0.011, 1840.0, 1, -36, -42),
                 (3.356, 0.015, 1940.0, 5, -37, -36), (3.414, 0.013, 1810, 3, -32, -37),
                 (3.492, 0.009, 2040.0, 0.0, -33, -36.0), (3.763, 0.02, 1800.0, -1.5, -38, -40),
                 (3.801, 0.006, 1600.0, 1, -38, -51), (3.845, 0.013, 1620.0, 0.5, -40, -42),
                 (3.908, 0.0069, 1880.0, 0.5, -34, -34.0), (3.977, 0.012, 1500.0, -0.5, -40.5, -38),
                 (4.035, 0.0066, 1900, -4.5, -41.5, -45), (4.102, 0.017, 1400.0, 2, -43, -44),
                 (4.179, 0.022, 1750, 0.0, -41, -50), (4.246, 0.019, 2100.0, -2.5, -45.0, -35.5),
                 (4.328, 0.015, 1848, 1, -35, -33), (4.405, 0.017, 1470.0, 3.0, -37, -44.0),
                 (4.474, 0.017, 1640.0, -1, -45, -47), (4.54, 0.012, 1460.0, 3.5, -37.5, -39),
                 (4.586, 0.009, 2070, -2, -35.5, -44.5), (4.661, 0.018, 1454, 0.5, -40, -36.5),
                 (4.734, 0.0078, 1870, 1.5, -37, -28), (4.797, 0.0094, 1464, 0.5, -36.5, -35),
                 (4.871, 0.02, 1840.0, 0.0, -33.5, -34), (4.934, 0.011, 1490, -1, -32.5, -39),
                 (4.997, 0.017, 1840.0, -0.5, -42.5, -29), (5.061, 0.0056, 1635, 1, -42, -36),
                 (5.137, 0.012, 1853, 1, -33, -29.5), (5.218, 0.014, 1490.0, 4, -36, -40),
                 (5.272, 0.0079, 1890, -1, -32.5, -31.5), (5.334, 0.013, 1490.0, -2.5, -41, -42.0),
                 (5.413, 0.019, 1777, 0.0, -39, -39.5), (5.492, 0.018, 1486, 1, -42, -36.5),
                 (5.552, 0.012, 1807, -0.5, -35.5, -29.5), (5.615, 0.0064, 1480.0, -0.5, -43, -36),
                 (5.692, 0.014, 1780.0, 0.5, -33.5, -33), (5.832, 0.012, 1850, 0.5, -37, -34.5),
                 (5.904, 0.009, 1500.0, -0.5, -34.5, -35.0), (5.964, 0.012, 1800.0, -0.5, -40, -33),
                 (6.2, 0.018, 1855, 0.0, -46.5, -35), (6.256, 0.01, 2005, -0.5, -35.5, -34),
                 (6.326, 0.017, 1640.0, -1.0, -41, -41), (6.456, 0.017, 1694, 0.5, -40.5, -45),
                 (6.526, 0.018, 2106, 0, -41.5, -45), (6.594, 0.015, 1830, 0.5, -35.5, -36.0),
                 (6.666, 0.009, 1980, -1, -50, -37.0), (6.733, 0.026, 1660, 2.5, -35, -39),
                 (6.77, 0.019, 1795, -0.5, -39, -35)]


def squeaks(arch=0.01194, rough=0.71, spread_hz=330, third_db=-4, fourth_db=-4):
    """Each passing stone sticks and slips: a short, rough, gliding rasp with three overtones."""
    out, waver = np.zeros((2, N)), drift(700)
    # the slips are uneven, so every partial is smeared into a narrow band
    smear = rough * np.array([[drift(spread_hz) + 1j * drift(spread_hz) for ear in range(2)]
                              for partial in range(4)])
    all_lags = rng.uniform(-np.pi, np.pi, (len(STONE_SQUEAKS), 4))
    for (s, length, hz, glide, base_db, octave_db), lags in zip(STONE_SQUEAKS, all_lags):
        near = slice(int((s - .04) * SR), int((s + .04) * SR))
        t = T[near] - s
        u = t / length
        # a glide, plus an arch that raises the pitch away from the middle
        pitch = hz * (1 + glide * t + arch * np.tanh(u * u) + .014 * waver[near])
        phase = 2 * np.pi * np.cumsum(pitch) / SR
        for k, db in enumerate([base_db, octave_db, octave_db + third_db, octave_db + fourth_db]):
            ears = np.array([[0], [1.1 * lags[k]]])
            partial = np.real((1 + smear[k, :, near]) * np.exp(1j * ((k + 1) * phase + ears)))
            out[:, near] += amp(db) * np.exp(-u * u) * partial
    return out


# spectrum of the rasp that comes with each squeak: (f/Hz, level/dB per Hz)
CHAFE_SPECTRUM = [(900, -16), (1350, -4.5), (1750, 5.5), (2100, 0), (2500, -4), (3100, 0), (4000, 4),
                  (4800, -7), (5600, -5), (7200, -2), (9000, -5.5), (16000, -28)]


def chafing(stretch=2.2):
    """Around each squeak the stone slips unevenly and rasps, so every pass swells out of the hiss."""
    rows = []
    for s, length, hz, glide, base_db, octave_db in STONE_SQUEAKS:
        both_db = 20 * np.log10(np.hypot(amp(base_db), amp(octave_db)))
        rows.append((s, stretch * length, both_db))
    return amp(-2) * swells(rows) * colour(grains(0.16, rough_db=4.5, rate=350), CHAFE_SPECTRUM)


def chirping(count=330, length=.007, level_db=-10, spread_db=3, glide_per_s=5):
    """Single grits catch all through the grinding, each with a brief gliding chirp at a pitch of its own."""
    out = np.zeros((2, N))
    first, last = DRILL_RUNS[0][0], DRILL_RUNS[-1][1]
    for when, pitch, size, bend, lag in rng.random((count, 5)):
        s = first + when * (last - first)
        hz = 1150 * (8000 / 1150) ** pitch
        near = slice(int((s - .02) * SR), int((s + .02) * SR))
        t = T[near] - s
        ears = np.array([[0], [2 * np.pi * lag]])
        phase = 2 * np.pi * hz * (t + glide_per_s * (bend - .5) * t * t) + ears
        # chirps are louder at pitches where the grinding is strong
        db = level_db + spread_db * (2 * size - 1) + .5 * max(along(GRIND_SPECTRUM, hz)[0], -10)
        out[:, near] += amp(db) * np.exp(-(t / length) ** 2) * np.sin(phase)
    return out


# the hone's steel arms sing: (t/s at the middle, length/s, f/Hz, level/dB)
ARM_SONG = [(1.047, .022, 2690, -23.5), (1.07, 0.023, 2810, -28), (1.088, .025, 2680, -28),
            (1.17, 0.075, 2620, -31.5), (1.226, .02, 2700, -23.5), (1.255, 0.046, 2710, -28),
            (1.45, 0.15, 2580, -50), (1.82, .05, 2610, -36.5), (1.97, .1, 2610, -30.5),
            (2.11, 0.064, 2580, -29), (2.34, 0.13, 2570, -43), (2.51, .08, 2586, -28),
            (2.7, 0.2, 2630, -35), (2.9, 0.068, 2650, -39), (3.14, 0.22, 2620, -36), (3.4, 0.27, 2633, -33),
            (3.95, 0.17, 2434, -37.5), (4.26, 0.18, 2480, -36), (5.08, .3, 2550, -41),
            (5.6, 0.56, 2540, -49), (6.22, 0.043, 2690, -30.5), (6.41, .15, 2680, -31.5),
            (6.51, 0.066, 2670, -34), (6.635, 0.19, 2644, -31.5)]


def singing():
    """The rubbed steel holds one thin, rough note."""
    note = tones(ARM_SONG, wander=0.00305, waver_hz=28.1, flicker_db=2.5)
    return amp(-2.0) * note * (1 + 0.23 * np.tanh(drift(150)))


# a stone digs into the wall: (t/s when it lets go, build-up/s, level/dB, squeal f/Hz)
STONE_BITES = [(3.747, 0.036, -17.5, 6250), (3.805, 0.018, -16.5, 6160), (3.851, 0.027, -14, 6720),
               (3.885, 0.0095, -18.0, 6030), (3.927, 0.003, -14, 6550), (3.931, 0.044, -16.5, 6540),
               (3.969, 0.003, -13, 6200), (3.989, 0.036, -19, 6500), (4.058, 0.045, -14.5, 6590),
               (4.118, 0.036, -15, 6260), (4.163, 0.016, -16, 6600), (4.187, 0.023, -19, 6500),
               (4.257, 0.044, -26, 6070), (4.311, 0.041, -20, 6200), (4.355, 0.05, -17.5, 6160),
               (4.376, 0.003, -15, 6120), (4.415, 0.019, -16, 6740), (4.445, 0.004, -14, 6460),
               (4.48, 0.0025, -12, 6450), (4.482, 0.046, -16.5, 6700), (4.522, 0.0071, -15, 6200),
               (4.543, 0.033, -16, 6570), (4.607, 0.009, -13.5, 6560), (4.61, 0.045, -17.5, 6370),
               (4.67, 0.027, -16, 7020), (4.7, 0.0054, -15, 6120), (4.752, 0.003, -24.5, 6600),
               (4.754, 0.048, -15, 6580), (4.807, 0.021, -15.5, 7190), (4.844, 0.005, -18.0, 6420),
               (4.887, 0.045, -19, 6200), (4.946, 0.044, -16, 6500), (4.984, 0.008, -17.0, 6200),
               (5.028, 0.05, -16.5, 6500), (5.079, 0.032, -16.0, 6290), (5.143, 0.026, -18, 7400),
               (5.168, 0.041, -18, 6500), (5.191, 0.0052, -17, 6370), (5.221, 0.0074, -13, 6260),
               (5.255, 0.004, -17.0, 6160), (5.285, 0.0034, -16, 6160), (5.297, 0.032, -16.5, 6160),
               (5.33, 0.0027, -17.0, 7060), (5.362, 0.034, -15, 6720), (5.387, 0.0032, -15, 6550),
               (5.439, 0.042, -14, 6150), (5.474, 0.004, -10.5, 6550), (5.5, 0.022, -15, 6520),
               (5.549, 0.003, -16.5, 7150), (5.579, 0.05, -16.5, 6270), (5.613, 0.004, -13, 7110),
               (5.631, 0.01, -12.5, 6340), (5.666, 0.01, -24, 6330), (5.682, 0.003, -12, 7200),
               (5.718, 0.0035, -12, 6460), (5.72, 0.044, -21.5, 6540), (5.758, 0.011, -14.5, 7020),
               (5.777, 0.017, -14.5, 6500), (5.81, 0.01, -21, 6300), (5.858, 0.036, -15.5, 6240),
               (5.912, 0.02, -14.5, 6720), (5.948, 0.007, -25, 6330), (5.999, 0.048, -14.5, 6080),
               (6.231, 0.031, -18.5, 6200), (6.3, 0.003, -13, 7190), (6.331, 0.018, -20, 6930),
               (6.407, 0.008, -21.0, 6590), (6.448, 0.004, -16, 6720), (6.466, 0.003, -13.5, 7050),
               (6.536, 0.007, -16.5, 6170), (6.6, 0.057, -19, 6630), (6.707, 0.059, -17, 6750),
               (6.721, 0.0048, -11.5, 5860), (6.762, 0.005, -15, 6590)]
# spectrum of the biting rasp: (f/Hz, level/dB per Hz)
BITE_SPECTRUM = [(700, -33.5), (1200, -12), (1700, -1.5), (2450, -9), (3200, -10), (4200, -0.5),
                 (5000, -3.5), (5800, -1), (6400, 7.5), (7300, 2), (8800, -5), (11000, -8.5), (13000, -22),
                 (16000, -24)]


def biting(squeal_db=-10, waver_hz=200, release_s=0.0032):
    """A stone digs in harder and harder, then lets go at once: a harsher rasp with a rough squeal on top."""
    grip_sum, squeal, waver = np.zeros(N), np.zeros((2, N)), drift(900)
    lags = rng.uniform(0, np.pi, len(STONE_BITES))
    for (s, build, db, hz), lag in zip(STONE_BITES, lags):
        near = slice(int((s - 2 * build) * SR), int((s + .03) * SR))
        t = T[near] - s
        grip = amp(db) * np.exp(np.where(t < 0, -(t / build) ** 2, -t / release_s))
        grip_sum[near] = np.hypot(grip_sum[near], grip)  # overlapping bites add in power
        phase = 2 * np.pi * np.cumsum(hz + waver_hz * waver[near]) / SR
        squeal[:, near] += grip * np.sqrt(2) * np.sin(phase + np.array([[0], [lag]]))
    rasp = grip_sum * colour(grains(0.059, rough_db=2.5, rate=630), BITE_SPECTRUM)
    return amp(-5.5) * rasp + amp(squeal_db + 1.0 * drift(500)) * squeal


def scene():
    """Handling and honing in a cluttered garage, each with its own room reflections."""
    handling = dragging() + knocks() + rubbing()
    run = running()
    hiss, shake = run * pressure()
    squeaking = run * (amp(7.0) * squeaks() + hiss * chirping() + chafing() + singing())
    honing = grinding(hiss, run * biting()) + squeaking + rumbling(shake) + amp(2.5) * ticks()
    reflections = amp(-14.5) * room(honing, t60=0.047) + amp(-15) * room(handling, t60=0.17)
    return garage_air() + handling + honing + reflections


CUTOFF_HZ = 16000


def record(dry):
    """The highest peaks are rounded and the top is cut steeply."""
    rounded = dry / (1 + (dry / .62) ** 4) ** .25
    lowpass = signal.ellip(12, .1, 80, CUTOFF_HZ, fs=SR, output="sos")
    return signal.sosfilt(lowpass, rounded)


dry = scene()
out = record(dry)
bounce(out)
```